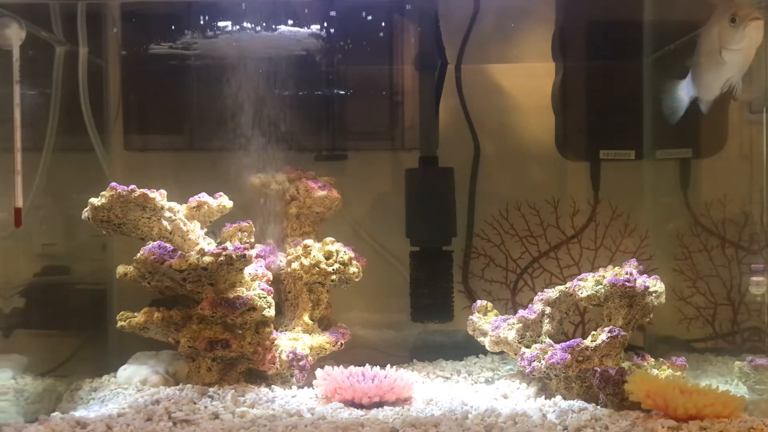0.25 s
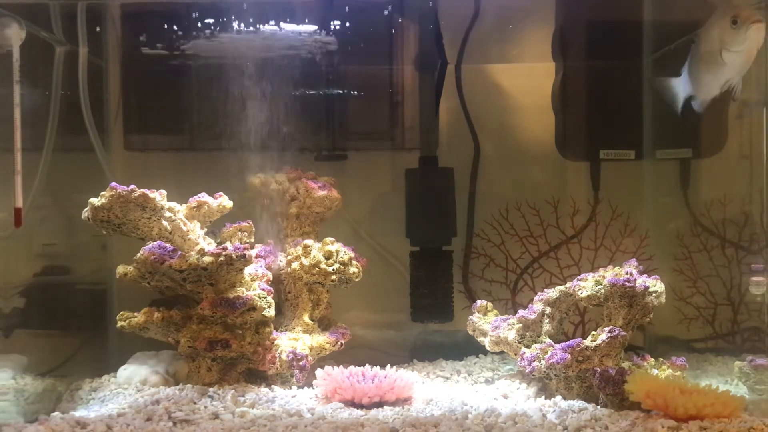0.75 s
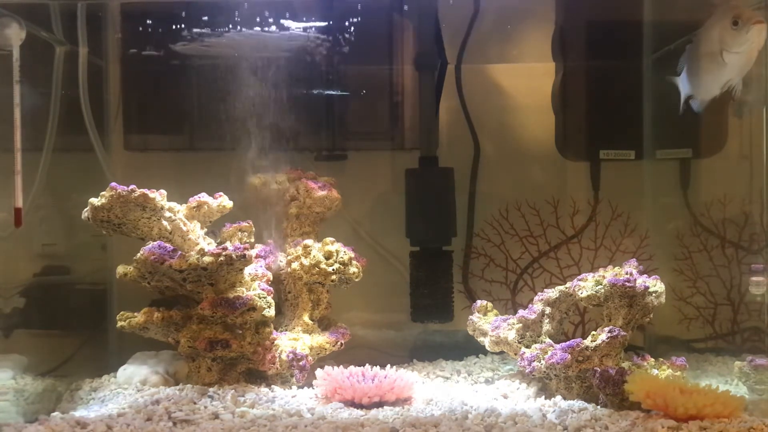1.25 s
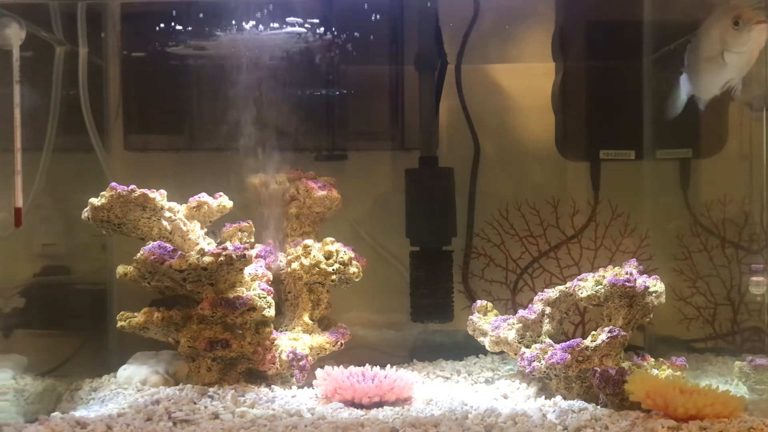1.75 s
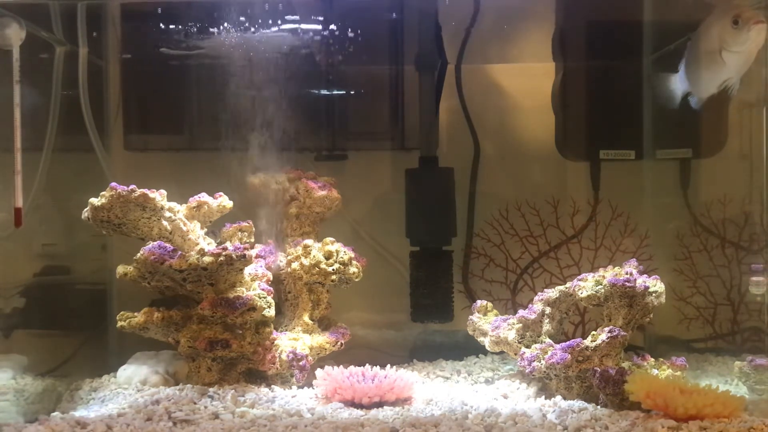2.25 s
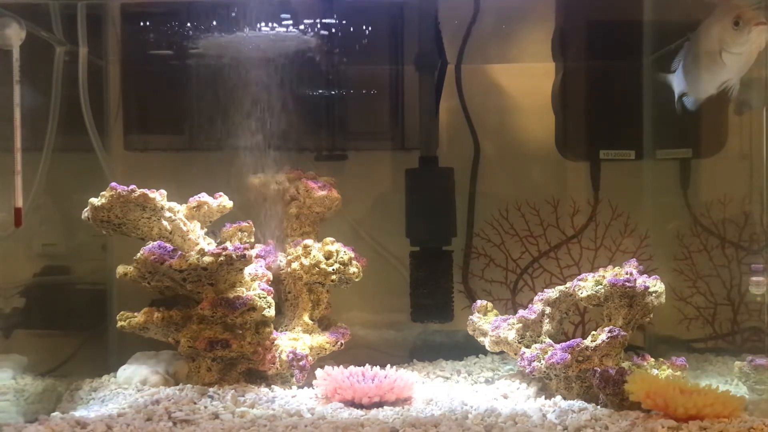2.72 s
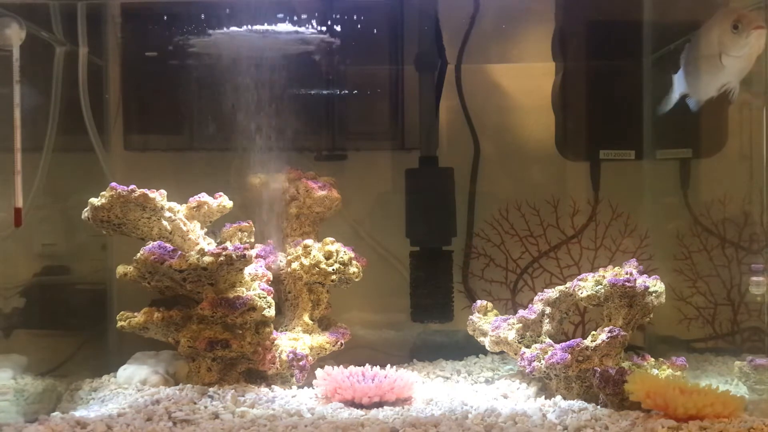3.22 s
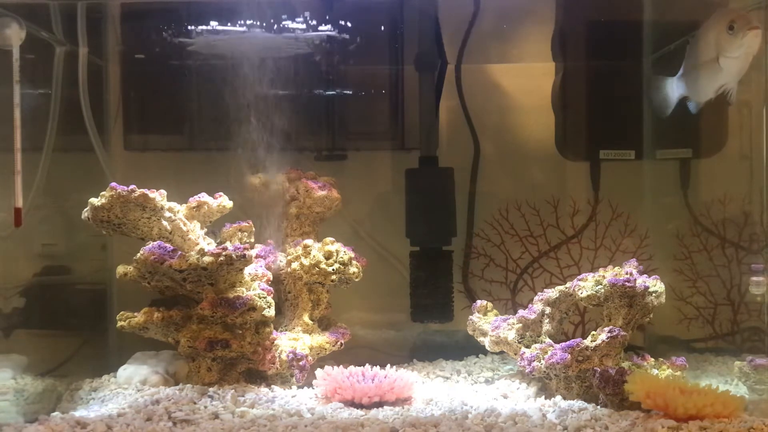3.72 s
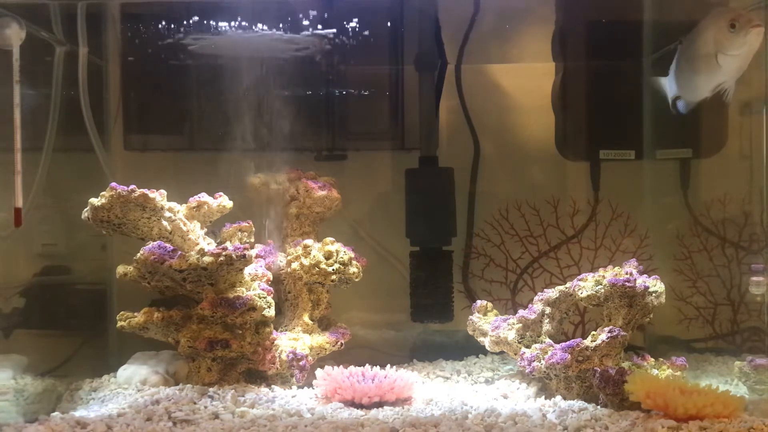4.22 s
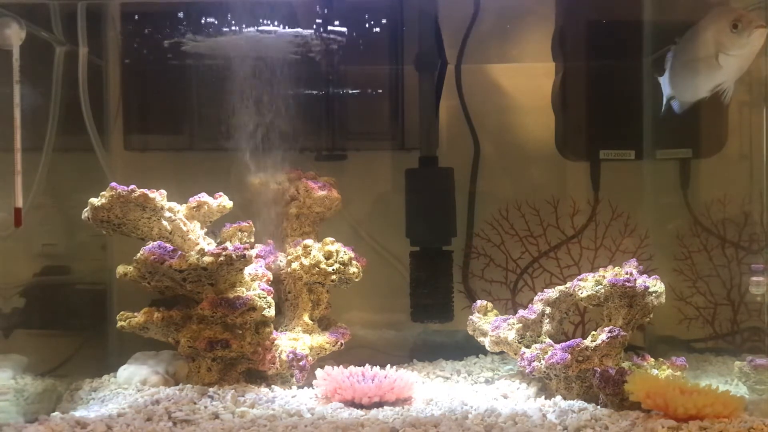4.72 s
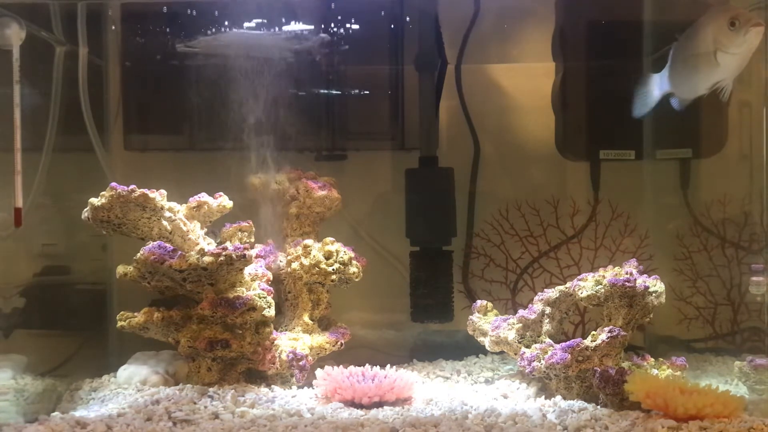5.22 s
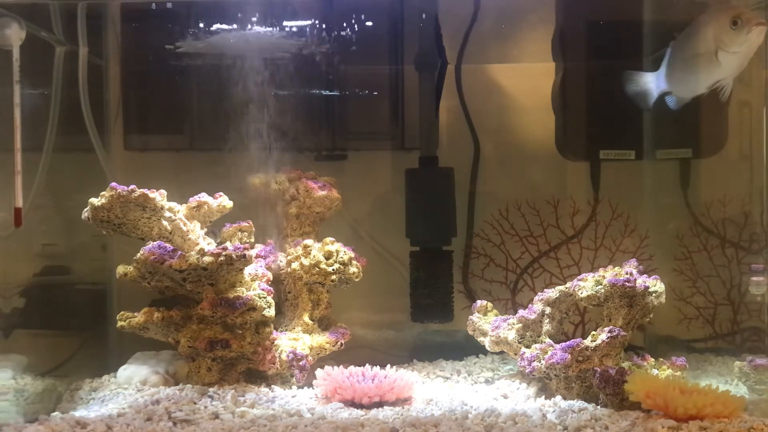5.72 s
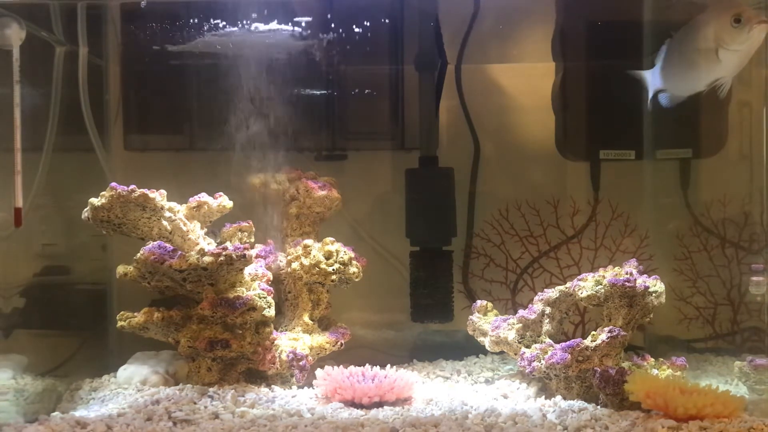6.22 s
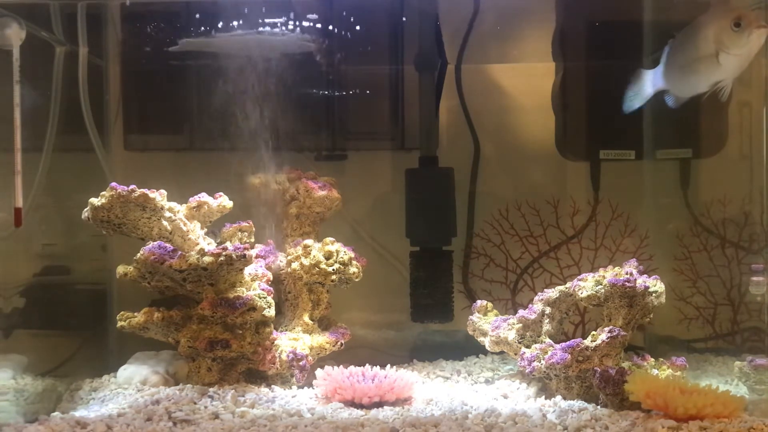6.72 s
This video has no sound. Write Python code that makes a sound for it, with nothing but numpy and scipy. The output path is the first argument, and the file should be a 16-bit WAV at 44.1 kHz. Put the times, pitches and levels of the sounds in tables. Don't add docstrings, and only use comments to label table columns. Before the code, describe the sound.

For about seven seconds a fish tank's air pump hums steadily, a deep mains tone around 100 Hz with faint buzzing overtones. Under it, floor rumble rises and sinks, with soft dull bumps near 0.9 and 2.7 s. Fine bubbles fizz continuously with a hollow ring around 1 kHz, and water washes gently at the surface. Larger bubbles pop irregularly from 0.7 s, each a brief damped two-note plop; clear ones fall near 1.2, 3.2 and 3.7 s, a closer cluster runs from 4.0 to 4.7 s, and more follow until 6.6 s. A faint rustle opens the scene; a sharp, bright tick comes at 1.5 s, grainy rustling around 3 to 3.5 s, and small ticks later. Hose and electrical whistles stay barely audible. A close small microphone hisses evenly in the quiet room; the sound continues without a conclusion.

```python
import sys
import numpy as np
from scipy import signal
from scipy.fft import rfft, irfft
from scipy.io import wavfile
from scipy.ndimage import uniform_filter1d

SR = 44100
rng = np.random.default_rng(int(sys.argv[2]) if len(sys.argv) > 2 else 0)


def to_wav(s):
    ch = np.atleast_2d(s).T
    pcm = np.round(np.clip(ch, -1, 1) * 32767)
    wavfile.write(sys.argv[1], SR, pcm.astype(np.int16))


def gain_from_db(level_db):
    decades = np.asarray(level_db, float) / 20
    return 10 ** decades


N = 306555
T = np.arange(N) / SR

# (multiple of the mains, level [dB rms])
HUM_MULTIPLES = [(2, -48), (3, -66.5), (4, -87), (5, -69), (6, -68), (7, -94.5), (8, -71), (9, -95),
                 (10, -68.5), (11, -78.5), (12, -83), (13, -74.5), (14, -79.5), (15, -82.5), (16, -82),
                 (17, -82), (18, -81.5), (19, -87), (20, -77.5), (21, -89), (24, -94), (30, -88),
                 (33, -102.0), (34, -98), (35, -89), (37, -92.5), (38, -95.5), (39, -100.4)]
# (frequency [Hz], power per Hz [dB])
FLOOR_COLOUR = [(20, -44), (32, -22), (42, -10.5), (53, -1.5), (65, -6), (80, -8), (95, -6), (110, -27),
                (140, -40)]
# (frequency [Hz], power per Hz [dB])
FAR_COLOUR = [(15, -108), (24, -102), (32, -91), (45, -85), (70, -83.5), (88, -80), (100, -81.5),
              (115, -95)]
# (time [s], peak [dB], half length [s])
FLOOR_SWELLS = [(.26, -48, 0.16), (.66, -50, 0.056), (.98, -47, 0.11), (1.33, -53, 0.079),
                (1.62, -50.5, .07), (1.9, -50.5, 0.11), (2.45, -53, 0.3), (2.71, -43, 0.04),
                (2.84, -52, .04), (3.05, -50, .12), (3.38, -53, 0.068), (3.67, -48.5, 0.1),
                (3.93, -52, .07), (4.11, -54, .04), (4.38, -52, 0.081), (4.8, -52, 0.11), (5.11, -51, .05),
                (5.33, -53, 0.062), (5.66, -54, 0.092), (6.11, -49, .07), (6.4, -53, .12), (6.61, -49, .04),
                (6.88, -51, 0.082)]
# (time [s], peak [dB], pitch [Hz], length [s])
HOUSE_BUMPS = [
    (0.943, -51, 55, 0.11),
    (2.677, -46, 49.4, 0.078),
]
# (frequency [Hz], power per Hz [dB])
ROOM_COLOUR = [(60, -99), (110, -89.5), (135, -89), (175, -94), (210, -91), (350, -95.5), (430, -97),
               (600, -99), (700, -100), (800, -103), (1300, -104), (1600, -112), (2200, -125)]
# (frequency [Hz], power per Hz [dB])
WATER_COLOUR = [(900, -36), (1300, -5), (1550, 0), (1900, -2), (2150, -4), (2700, -10.5), (3500, -28),
                (5000, -22)]
# (time [s], peak [dB], half length [s])
SURFACE_SPLASHES = [(.06, -79, 0.037), (.45, -79, .1), (1.18, -73.5, .1), (1.54, -75, 0.082),
                    (1.99, -74, .03), (2.67, -71, .02), (3.15, -76.5, 0.31), (4.035, -73, 0.027),
                    (4.9, -78, 0.16), (5.42, -75, 0.082), (6.21, -77, .15), (6.73, -78, .04)]
# (frequency [Hz], power per Hz [dB])
HISS_COLOUR = [(1800, -116), (2500, -109.5), (4600, -109), (4900, -114.5), (5400, -111), (7300, -112),
               (7650, -115.5), (8800, -112), (9900, -113), (10400, -116), (11200, -113), (12600, -111.5),
               (14200, -113), (16500, -114)]
# (frequency [Hz], width [Hz], level [dB rms])
HOSE_NOTES = [(129.3, 3.9, -81), (381.4, 10, -80.5), (643.3, 8.9, -78), (4550, 80, -91.5),
              (11330, 190, -90), (14700, 150, -92.5)]
# (frequency [Hz], width [Hz], level [dB rms])
ELECTRIC_WHISTLE = [(5720, 30, -94), (11440, 22, -90)]
# (frequency [Hz], time to fall 60 dB [s], level [dB])
LID_MODES = [(958.5, .08, -4), (1046, 0.074, -1.5), (1129, 0.054, -4.5), (1250, .06, -7),
             (1340, 0.043, -9.5), (1434, 0.053, -7.5), (1848, 0.054, -17.5)]
# (time [s], strength [dB], brightness of the upper lid modes [dB])
BUBBLE_STREAM = [(0.0, -68, 1.5), (0.6, -70.5, -2), (0.89, -69, 2), (1.2, -69, -1), (1.51, -66, -2.5),
                 (2.32, -69, 0), (2.77, -69.5, -1.5), (3.17, -66.5, -3.5), (3.39, -70, 0), (4.65, -68, 2.5),
                 (4.97, -70, -1.5), (5.46, -70.5, -1), (6.58, -69, 0), (6.95, -70, 0)]
# (time [s], level [dB], centre [Hz], width [Hz], length [s])
RUSTLE_BURSTS = [(0.0, -77, 6000, 6000, 0.28), (1.35, -81, 4200, 2500, 0.4),
                 (1.519, -64, 14500, 5000, .012), (2.963, -76, 4180, 3000, 0.59),
                 (3.0, -74.5, 2470, 700, 0.31), (3.35, -70.5, 4020, 1200, .05),
                 (3.357, -74, 5200, 2600, .055), (3.49, -72, 4800, 2500, 0.024),
                 (4.55, -71, 3000, 2000, .01), (4.817, -70, 8000, 9000, .02), (5.527, -72, 6000, 3000, .01),
                 (5.98, -73, 6500, 6000, .012), (6.42, -75, 6500, 2500, .01)]
# (time [s], peak [dB], upper note [Hz], lower minus upper note [dB])
BIG_POPS = [(0.6737, -56, 1225, -1), (0.7938, -57.5, 1250, -13), (0.9177, -68, 1260, 1),
            (1.1764, -53, 1250, -18), (1.3561, -70, 1410, 6), (1.6354, -58, 1230, -1),
            (2.1091, -62, 1250, 10), (2.337, -59.5, 1160, -1), (2.4184, -62, 1190, -2),
            (2.547, -64, 1270, 6), (2.83, -59, 1250, -2), (2.984, -58.5, 1250, 6),
            (3.2453, -55.5, 1240, -18), (3.3288, -62, 1350, 6), (3.7485, -50.5, 1210, -20),
            (4.002, -58, 1250, -10), (4.156, -62, 1140, -2), (4.2193, -54, 1220, -6),
            (4.336, -53.5, 1215, -13), (4.469, -54, 1250, -12), (4.6244, -70, 1340, 9),
            (4.6887, -54, 1194, -4), (5.153, -60, 1150, -5), (5.298, -64, 1160, 0), (5.5767, -67, 1320, 10),
            (5.861, -59, 1250, -14), (6.0868, -54, 1250, -15), (6.328, -55.5, 1220, -18),
            (6.5575, -54.5, 1190, -11)]


def unit(x):
    return x / np.sqrt(np.mean(x ** 2))


def coloured(table):
    hz, db = np.transpose(table)
    log_hz = np.log(np.arange(1, N // 2 + 2) * SR / N)
    gain = gain_from_db(np.interp(log_hz, np.log(hz), db, left=-200, right=-200))
    return irfft(rfft(rng.standard_normal(N)) * gain, N) * np.sqrt(SR / 2)


def band(x, hz, width):
    return signal.lfilter(*signal.iirpeak(hz, hz / width, SR), x)


def ring(x, hz, t60):
    pole = np.exp((2j * np.pi * hz - np.log(1000) / t60) / SR)
    return signal.lfilter([1], [1, -pole], x).imag


def walk(rate):
    hold = int(SR / rate)
    steps = np.repeat(rng.standard_normal(N // hold + 1), hold)
    smooth = uniform_filter1d(uniform_filter1d(steps, hold), hold)
    return unit(smooth[:N])


def flicker(x, edges_hz, slow_db, quick_db):
    out = 0
    for hz in edges_hz:
        low = signal.sosfiltfilt(signal.butter(2, hz, fs=SR, output="sos"), x)
        out = out + low * gain_from_db(slow_db * walk(3.26) + quick_db * walk(21.96))
        x = x - low
    return out + x * gain_from_db(slow_db * walk(4) + 1.1 * quick_db * walk(22))


def humps(table, rest_db):
    power = gain_from_db(rest_db) ** 2
    for s, db, half in table:
        power = power + gain_from_db(db) ** 2 * np.exp(-((T - s) / half) ** 2)
    return np.sqrt(power)


def stream(column=1):
    columns = np.transpose(BUBBLE_STREAM)
    return np.interp(T, columns[0], columns[column] - np.median(columns[column]))


def pump():
    mains_hz = 49.957
    speed_up = .004 * (T - 2.6) ** 2
    out = np.zeros(N)
    for k, db in HUM_MULTIPLES:
        lag = .215 * (k - 6.33) ** 2 - .8 - .8 * (k % 3 == 0)
        waver_db = (0.3 + 0.032 * k) * (k > 2) * walk(5)
        tone = np.cos(2 * np.pi * k * mains_hz * T + k * speed_up - lag)
        out += gain_from_db(db + waver_db) * np.sqrt(2) * tone
    return out


def rumble():
    shake = coloured(FLOOR_COLOUR)
    window = int(0.025 * SR)
    power = uniform_filter1d(uniform_filter1d(shake ** 2, window), window)
    shake = shake / np.sqrt(power)
    steep = signal.butter(3, [38, 76], "bandpass", fs=SR, output="sos")
    near = signal.sosfiltfilt(steep, shake * humps(FLOOR_SWELLS, -60)) * gain_from_db(-3.6)
    out = near + coloured(FAR_COLOUR)
    for s, db, hz, length in HOUSE_BUMPS:
        swell = np.sin(np.pi * np.clip((T - s) / length, 0, 1))
        bump = gain_from_db(db + 3.0) * swell * np.sin(2 * np.pi * hz * T)
        out = out * (1 - 0.36 * swell) + bump
    return out


def room_air():
    return coloured(ROOM_COLOUR) * gain_from_db(0.37 * walk(3))


def wash():
    level = humps(SURFACE_SPLASHES, -77.5 + .4 * stream())
    return unit(coloured(WATER_COLOUR)) * level * gain_from_db(0.86 * walk(12))


def hiss():
    return flicker(coloured(HISS_COLOUR), [3500, 6000, 10000], slow_db=0.2, quick_db=0.8)


def spray(per_s=12):
    drops = (rng.random(N) < per_s / SR) * gain_from_db(1.9 * rng.exponential(size=N))
    fading = signal.lfilter([1], [1, -.994], drops)
    return fading * band(rng.standard_normal(N), 9800, 5000) * gain_from_db(-67)


def whistles():
    out = np.zeros(N)
    for hz, width, db in HOSE_NOTES + ELECTRIC_WHISTLE:
        note = unit(band(rng.standard_normal(N), hz, width))
        out += gain_from_db(db + 0.97 * walk(2.5)) * note
    return out


def hush():
    gain = np.ones(N)
    for s, db, *_ in BIG_POPS:
        if db > -57:
            gain *= 1 - 0.31 * (T < s) * np.exp(-np.abs(s - T) / 0.044)
    return gain


def fizz(per_s=700):
    bright_db = stream(column=2)
    out = 0
    for hz, t60, db in LID_MODES:
        sizes = gain_from_db(1.4 * rng.exponential(size=N)) * rng.standard_normal(N)
        bursts = (rng.random(N) < per_s / SR) * sizes
        share = np.clip((hz - 1050) / 250, 0, 1)
        patches = gain_from_db(db + share * bright_db + 0.74 * walk(8))
        out = out + patches * unit(band(ring(bursts, hz, t60), hz, 500))
    return unit(out) * hush() * gain_from_db(-67 + .8 * stream() + .6 * walk(14))


def rustles():
    out = np.zeros(N)
    for s, db, hz, width, length in RUSTLE_BURSTS:
        age = np.clip((T - s) / length, 0, None)
        noise = band(band(rng.standard_normal(N), hz, width), hz, width)
        grain = noise * gain_from_db(1.3 * walk(150))
        out += gain_from_db(db) * unit(grain) * np.minimum(8 * age, 1) * np.exp(-age ** 2)
    return out


def pops():
    t60, rise = .03, .0015
    out, clicks = np.zeros(N), np.zeros(N)
    t = np.arange(SR // 8) / SR
    shape = (1 - np.exp(-t / rise)) * 1000 ** (-t / t60)
    for s, db, upper_hz, lower_db in BIG_POPS:
        i = int(s * SR)
        lower_hz = 1016 - lower_db
        upper = np.sin(2 * np.pi * upper_hz * t)
        slower_fade = np.exp(t / t60 * 1.8)
        lower = gain_from_db(lower_db - 6.0) * slower_fade * np.sin(2 * np.pi * lower_hz * t)
        out[i:i + len(t)] += gain_from_db(db + 3.5) * (upper + lower) * shape / shape.max()
        clicks[i] = gain_from_db(db + max(lower_db, 0))
    for hz, mode_t60, db in LID_MODES:
        out += gain_from_db(db - 25) * band(ring(clicks, hz, 1.9 * mode_t60), hz, 400)
    return out


def scene():
    air = room_air() + wash() + hiss() + spray() + whistles()
    return (pump() + rumble() + air + fizz() + rustles() + pops())[None]


def band_limit(x):
    return signal.sosfilt(signal.butter(12, 15840, fs=SR, output="sos"), x)


def record(dry):
    top = signal.ellip(12, .2, 22, 15740, fs=SR, output="sos")
    mix = signal.sosfilt(top, dry)
    return band_limit(mix)


dry = scene()
out = record(dry)
to_wav(out)
```